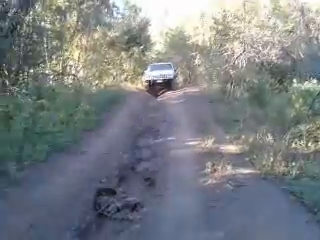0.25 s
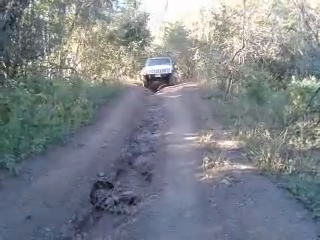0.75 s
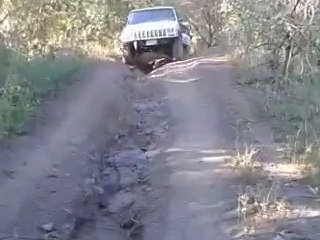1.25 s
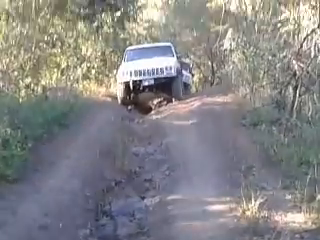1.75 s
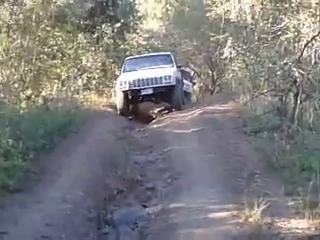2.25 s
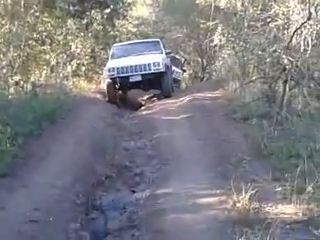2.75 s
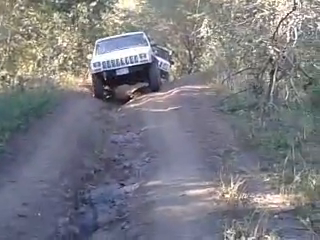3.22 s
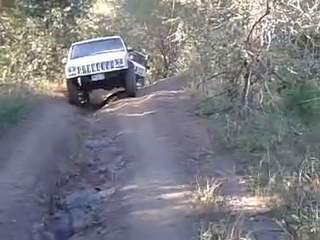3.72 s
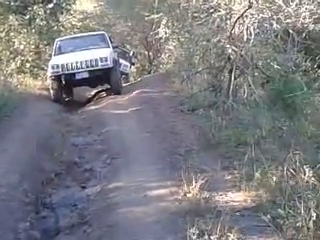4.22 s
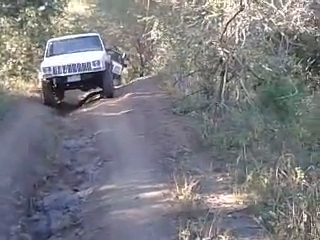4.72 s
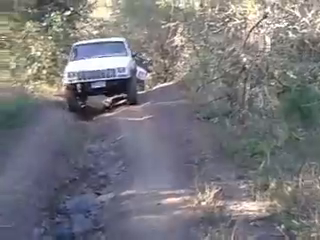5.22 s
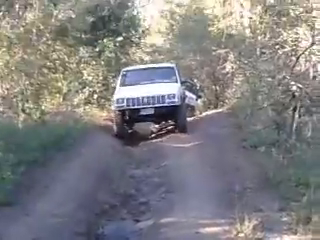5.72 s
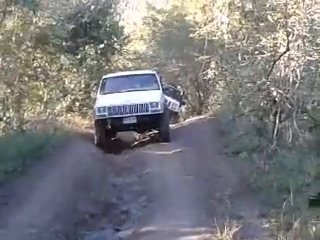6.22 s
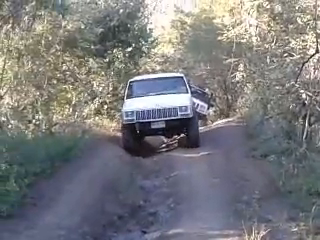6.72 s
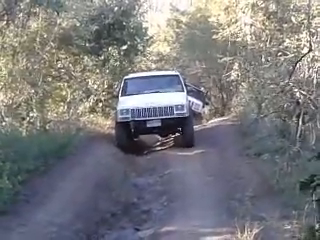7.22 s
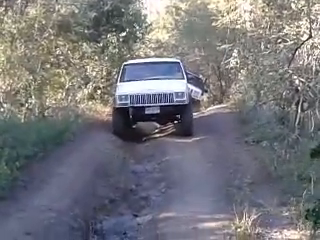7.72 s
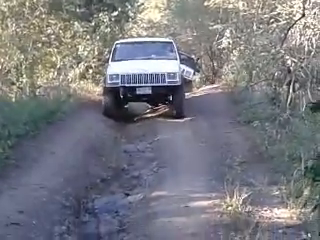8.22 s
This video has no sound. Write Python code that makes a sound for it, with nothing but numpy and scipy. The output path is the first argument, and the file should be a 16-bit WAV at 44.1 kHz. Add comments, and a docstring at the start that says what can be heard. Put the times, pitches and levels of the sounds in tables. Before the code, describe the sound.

Loud close knocks and cracks on a plastic case, then a distant rough engine idling steadily uphill, with more handling clicks and a faint whine.

```python
"""A six-cylinder four-wheel-drive idles slowly up a rutted forest trail toward a small hand-held camera.
Fingers on the camera's plastic case and buttons make close knocks, cracks and creaks; its motor whines faintly.
The engine is a stack of wavering crank orders, with a second drone early on; fan, gears and tyres are
shaped noise. Knocks are damped rings with noise bursts, creaks dense ticks, the motor tones and a noise whir."""
import sys
import numpy as np
from scipy import signal
from scipy.fft import rfft, irfft, next_fast_len
from scipy.io import wavfile
from scipy.ndimage import uniform_filter1d

SR = 44100
rng = np.random.default_rng(int(sys.argv[2]) if len(sys.argv) > 2 else 0)


def gain_from_db(level_db):
    """Turn a decibel level (scalar or array-like) into a linear amplitude factor."""
    decades = np.asarray(level_db, float) / 20
    return 10 ** decades


def inscribe(sig):
    """Save sig as 16-bit PCM at rate SR to the path in sys.argv[1].

    A 1-D sig is mono; a 2-D sig holds one channel per row.
    Samples are clipped to [-1, 1] before scaling.
    """
    pcm = np.round(np.clip(np.atleast_2d(sig).T, -1, 1) * 32767)
    wavfile.write(sys.argv[1], SR, pcm.astype(np.int16))


N = 373086
TIME = np.arange(N) / SR

# Treble colour of cracks and creaks on the case: f/Hz, gain/dB
CRACK_COLOUR = [(1500, -26.5), (2500, -6.5), (3500, -6.5), (4800, -10.5), (5800, 0), (6800, -3.5),
                (7600, -32), (9000, -13.5)]


def level(x, db):
    """Scale to an rms level."""
    return x * gain_from_db(db) / np.sqrt(np.mean(x ** 2))


def curves(rows):
    """Columns of a time table, interpolated sample by sample."""
    s, *columns = np.transpose(rows)
    return [np.interp(TIME, s, column) for column in columns]


def colour(x, points):
    """Shape a spectrum through (Hz, dB) points."""
    hz, db = np.transpose(points)
    size = next_fast_len(len(x))
    bins_hz = np.fft.rfftfreq(size, 1 / SR)
    gain = gain_from_db(np.interp(np.log(bins_hz + 1), np.log(hz), db))
    return irfft(rfft(x, size) * gain, size)[:len(x)]


def band(x, hz, width_hz):
    """One resonance, gain 1 at the centre."""
    return signal.lfilter(*signal.iirpeak(hz, hz / width_hz, fs=SR), x)


def walk(rate):
    """Random levels held for 1 / rate seconds and slewed twice; spread near 1."""
    hold = int(SR / rate)
    steps = np.repeat(rng.standard_normal(N // hold + 1), hold)
    return 1.578 * uniform_filter1d(uniform_filter1d(steps, hold), hold)[:N]


def arch(start_s, length_s):
    """Half a sine over the given stretch, silent outside it."""
    return np.sin(np.pi * np.clip((TIME - start_s) / length_s, 0, 1))


def engine():
    """Crank orders as wavering tones; uneven cylinders fill the orders between the firings."""
    # Revs and two firing multiples: t/s, firing rate f/Hz, 6th multiple level/dB, 9th multiple level/dB
    revs = [(0.5, 35.3, -64, -66), (0.75, 36, -47, -63), (1.13, 35.6, -62, -62), (1.4, 36.38, -61, -59),
            (1.95, 36.19, -51.5, -49.5), (2.78, 35.5, -61, -52.5), (3.27, 37.5, -53, -51),
            (3.7, 36.66, -44.5, -48.5), (4.2, 36.32, -51, -48), (4.9, 35.05, -74, -53),
            (5.5, 37.37, -52, -52), (6.0, 37.23, -58, -50), (6.6, 36.8, -53, -51.5),
            (6.9, 35.7, -60, -47.5), (7.3, 36.33, -57.5, -50), (8.1, 35.8, -62, -49.5),
            (8.46, 36.27, -60, -50)]
    # Steady crank orders: multiple of the crank rate, level/dB against reference_db
    crank = [(1, -36), (2, -29.5), (3, -8), (4, -39), (5, -31.5), (6, -8), (7, -28), (8, -33.5), (9, -14.5),
             (10, -20.5), (11, -11), (13, -21), (14, -24.5), (15, -12.5), (16, -11.5), (17, -26.5),
             (19, -17), (20, -25.5), (21, -19.5), (22, -23), (23, -14.5), (24, -7), (25, -8.5), (26, -8),
             (28, -12), (29, -9), (30, -15), (31, -16), (32, -18.5), (33, -10.5), (34, -13), (35, -20.5),
             (36, -26.5)]
    reference_db, idle_hz = -51.5, 36
    firing_hz, sixth_db, ninth_db = curves(revs)
    firing_hz = firing_hz + 0.2044 * walk(4.0)
    turn = 2 * np.pi * np.cumsum(firing_hz / 3) / SR  # three firings a crank turn
    # the 4th firing multiple weakens as the revs rise above idle
    fourth_db = -51.5 - 1.5 * (firing_hz - idle_hz)
    orders = [(order, db + reference_db) for order, db in crank]
    orders += [(12, fourth_db), (18, sixth_db), (27, ninth_db)]
    out = 0
    # the orders keep nearly in step, so the exhaust puffs once a turn
    for order, db in orders:
        loudness = np.sqrt(2) * gain_from_db(db + 1.18 * walk(9.0))
        offset = 0.49 * walk(6.5) + 0.03035 * order ** 2 + 0.5 * rng.standard_normal()
        out = out + loudness * np.sin(order * turn + offset)
    return out, turn


def drone():
    """Fifth and sixth multiples of a slower pulse that rises and sinks in one arch early on."""
    start_s, length_s = 0.497, 1.157
    progress = np.clip((TIME - start_s) / length_s, 0, 1)
    swell = np.sin(np.pi * progress ** 1.39) ** 2
    turn = 2 * np.pi * np.cumsum(256 + 12.94 * swell) / SR  # Hz of the sixth multiple
    sixth = np.sin(turn)
    fifth = gain_from_db(-9.5) * np.sin(5 / 6 * turn)
    fade = np.clip((start_s + length_s - TIME) / 0.11, 0, 1)
    return fade * np.sqrt(2) * gain_from_db(-54.0 + 5.5 * swell) * (sixth + fifth)


def running(turn):
    """Fan, gears and tyres: flickering noise bands, bay resonances puffed by the engine, and grit scuffs."""
    # Swell of the running noise: t/s, lower bay gain/dB, treble gain/dB
    swells = [(0.45, -2.5, 3.5), (1.0, -5.5, 2), (1.38, -3.5, 5.5), (1.65, -2.5, 2), (2.3, 0.5, 2),
              (2.7, -4.5, 0.5), (3.2, -0.5, -0.5), (3.75, -0.5, -0.5), (4.0, -3.5, -0.5), (4.7, 0.5, -0.5),
              (5.05, 0, 1), (6.15, -0.5, -1.5), (6.5, -2, -0.5), (7.5, -2.5, -1.5), (8.3, 2, -.5)]
    # Spectral shape of the running noise: f/Hz, relative density/dB
    spectrum = [(20, -10.5), (60, -28.5), (100, -32), (140, -13), (260, -9.5), (330, -6.5), (600, -8),
                (1000, -3), (1700, -7.5), (2400, -12), (3000, -19.5), (4500, -20), (4900, -24.5),
                (5200, -23), (6000, -24.5), (6900, -20.5), (7400, -32.5), (8000, -66.5)]
    # Resonances of bonnet and grille: f/Hz, width/Hz, level/dB before puff and swell
    bay = [(334, 98, -55.5), (890, 230, -52), (1250, 59, -47), (1335, 75, -56.5), (1567, 90, -50),
           (4280, 330, -60), (6380, 89, -66.5)]
    # A tyre scuffs loose grit: t/s, length/s, level/dB before the arch
    scuffs = [(6.18, 0.055, -33), (3.42, .04, -38), (6.1, 0.045, -45)]
    lower_db, top_db = curves(swells)
    low_db, upper_db = 0.68 * walk(3.01), 1.3 * walk(2.5)
    noise = level(colour(rng.standard_normal(N), spectrum), -41.0)
    edges_hz = [20, 420, 1050, 1450, 2600, 4000, 5500, 9000]
    band_db = [np.zeros(N), low_db, lower_db, upper_db, top_db, top_db, 0.5 * top_db]
    out = np.zeros(N)
    for lo, hi, db in zip(edges_hz, edges_hz[1:], band_db):
        split = signal.butter(2, [lo, hi], "bandpass", fs=SR, output="sos")
        out += gain_from_db(db + 1.1 * walk(14.0)) * signal.sosfiltfilt(split, noise)
    for hz, width_hz, db in bay:
        # the lowest resonance puffs once a turn, the others once a firing
        puff = 1 + (0.8 * np.cos(turn) if hz < 500 else 0.36 * np.cos(3 * turn))
        swell_db = band_db[np.searchsorted(edges_hz, hz) - 1] + 0.49 * walk(4.2)
        out += puff * gain_from_db(swell_db) * level(band(rng.standard_normal(N), hz, width_hz), db)
    for start_s, length_s, db in scuffs:
        grit = band(band(rng.standard_normal(N), 1200.0, 1200.0), 1300.0, 1500.0)
        out += arch(start_s, length_s) * level(grit, db)
    return out


def knocks():
    """Each touch: a damped, rattly ring of the case, a mid snap and a crack of a millisecond or two."""
    # Knocks on case and buttons: t/s, ring f/Hz, ring level/dB, snap level/dB, crack level/dB
    touches = [(0.1274, 730, -13, -20, -31), (0.1625, 752, -0.5, -1.5, 0.5),
               (0.183, 710, -17.5, -14.5, -15), (.192, 590, -15, -12.5, -35), (.244, 505, -4.5, -5.5, 1),
               (0.2646, 477, -16, -16, -8.5), (0.3159, 400, -23.5, -14, -18), (0.3258, 300, -32, -35, -25),
               (.347, 600, -15.5, -19, -38), (.350, 330, -9, -24.5, -37), (0.4105, 930, -20, 0.5, 5.5),
               (0.4161, 550, -15, -9.5, -12.5), (2.0708, 1097, -15.5, 1.5, -3.5),
               (2.0725, 594, -11, -7.5, -35), (2.1487, 873, -25, -3, -9.5), (2.152, 745, -9.5, -2.5, -11),
               (2.157, 450, -11.5, -32, -38), (2.163, 480, -15, -26, -45), (2.188, 1004, -29, -35, -42),
               (2.2925, 800, -22, -17.5, -23), (2.325, 650, -13, -23, -19.5), (2.328, 603, -2.5, -14, -32),
               (2.399, 700, -17, -34, -40), (2.415, 900, -8, -4.5, -18.5), (2.4175, 424, -6, -2.5, -8),
               (2.420, 182, -10, -38, -38), (2.574, 1100, -23, -31, -20.5),
               (2.580, 1000, -20.5, -34, -20.5), (2.5952, 870, -4.5, -20, -3), (2.5992, 1110, -3, -16, -26),
               (2.607, 380, -16, -37, -50), (2.633, 945, -10, -28.5, -46), (2.673, 1220, -28, -20, -27),
               (2.955, 540, -21.5, -15.5, -24.5), (3.355, 645, -28, -39, -48),
               (3.435, 988.6, -35, -23.5, -35.5), (4.663, 6770, -11, -30, -15.5),
               (4.671, 6650, -21, -48, -45), (4.693, 6540, -32.5, -48, -43), (5.282, 605, -20, -38, -51),
               (5.284, 268, -25.5, -50, -50), (5.656, 600, -24.5, -37, -47),
               (7.2283, 6100, -31.5, -23, -33), (7.268, 5980, -34, -30.5, -40),
               (7.982, 1288, -25, -37, -47)]
    # Thin ticks of the case, too light to ring it: t/s, snap level/dB, crack level/dB
    ticks = [(2.2305, -42, -28.5), (2.3896, -32, -29), (2.429, -37, -25), (2.4897, -36, -31),
             (2.7501, -34, -27.5), (2.8634, -34, -24.5), (4.2702, -35, -36), (7.1565, -32, -29.5),
             (7.662, -37, -32)]
    button_above_hz = 3000  # higher rings are a button, one steady mode
    sag_share, sag_s = 0.24, 0.0066  # the case's pitch sags as the finger settles
    out, t = np.zeros(N + SR), np.arange(SR // 10) / SR
    burst = np.e * t / 0.00067 * np.exp(-t / 0.00059)
    sagging = (1 - sag_share) * t + sag_share * sag_s * (1 - np.exp(-t / sag_s))
    rows = list(touches) + [(s, button_above_hz, -np.inf, *dbs) for s, *dbs in ticks]
    for s, ring_hz, ring_db, snap_db, crack_db in rows:
        snap_noise, crack_noise, rattle_noise = rng.standard_normal((3, len(t)))
        if ring_hz < button_above_hz:
            t60_s = 0.014 + 4.5 / ring_hz  # a fixed time plus a few of its own cycles
            turn = 2 * np.pi * ring_hz * sagging
            ring = np.sin(turn) + 0.44 * np.sin(0.717 * turn) + 0.13 * np.sin(1.423 * turn)
        else:
            t60_s = 0.012
            ring = np.sin(2 * np.pi * ring_hz * t)
        rattle = band(band(rattle_noise, ring_hz, ring_hz), ring_hz, ring_hz)
        ring = ring + level(rattle, -5.5)
        fall = (1 - np.exp(-t / 0.00027)) * np.exp(-np.log(1000) * t / t60_s)
        snap = level(band(band(snap_noise, 1800.0, 2200.0), 1800.0, 2300.0), -4.5)
        crack = level(colour(crack_noise, CRACK_COLOUR), -7.0)
        i = int(s * SR)
        out[i:i + len(t)] += gain_from_db(ring_db) * fall * ring
        out[i:i + len(t)] += burst * (gain_from_db(snap_db) * snap + gain_from_db(crack_db) * crack)
    return out[:N]


def creaks():
    """Skin sticks and slips: dense uneven ticks into the body and the treble of the case."""
    # Fingers creak over the plastic: t/s, length/s, body level/dB, treble level/dB
    strokes = [(0.116, 0.035, -37, -44), (0.168, 0.052, -30, -37.5), (0.226, 0.033, -27.5, -32),
               (0.344, 0.011, -17.5, -47), (2.127, 0.021, -39, -36.5), (2.157, 0.019, -41, -47.5),
               (2.28, 0.01, -34, -35.5), (2.317, 0.036, -30.5, -42.5), (2.543, 0.019, -47.5, -41),
               (2.632, 0.024, -34, -37.5)]
    slips = rng.random(N) < 1500.0 / SR  # about 1500 a second
    ticks = slips * gain_from_db(2.5 * rng.exponential(size=N)) * rng.choice([-1, 1], N)
    body = level(band(band(ticks, 740.0, 990.0), 900.0, 2000.0), 0)
    treble = level(colour(ticks, CRACK_COLOUR), 0)
    out = np.zeros(N)
    for start_s, length_s, body_db, treble_db in strokes:
        stroke = np.maximum(arch(start_s, length_s), 0) ** 0.5
        out += stroke * (gain_from_db(body_db) * body + gain_from_db(treble_db) * treble)
    return out


def motor():
    """Steady lines from the camera's drive, a rough whine that grows, and one whir of the zoom."""
    # Rough whine: t/s, level/dB
    whine = [(.5, -64.5), (2, -64), (3.3, -55), (5.3, -53.5), (6.5, -47), (8.46, -48.5)]
    # Partials of the whine: multiple, level/dB against the whine, share of its swell
    partials = [(1, 0, 1), (1.5, -4, .5), (6, -16, .4)]
    # Drive lines: f/Hz, level/dB, waver/dB
    drive = [(37.9, -56.5, 2.5), (76.2, -56.5, 1.5)]
    # Zoom whir: t/s, length/s, f/Hz, width/Hz, level/dB before the arch
    zoom = (1.8, 1.2, 3860., 90., -56.5)
    whine_db, = curves(whine)
    mean_db = np.mean(whine_db)
    turn = 2 * np.pi * np.cumsum(825.3 + 1.5 * walk(2.5)) / SR
    tones = np.zeros(N)
    for multiple, part_db, share in partials:
        db = mean_db + share * (whine_db - mean_db) + part_db + 1.5 * walk(25.0)
        tones += gain_from_db(db) * np.sin(multiple * turn + 0.6 * walk(13.0))
    for hz, db, waver_db in drive:
        phase = 2 * np.pi * hz * TIME + 0.26 * waver_db * walk(12.0)
        tones += gain_from_db(db + waver_db * walk(7.4)) * np.sin(phase)
    start_s, length_s, hz, width_hz, db = zoom
    whir = level(band(rng.standard_normal(N), hz, width_hz), db)
    return np.sqrt(2) * tones + np.maximum(arch(start_s, length_s), 0) ** 0.5 * whir


def scene():
    """Vehicle at a distance, camera noises close; the case passes little deep bass to the microphone."""
    tones, turn = engine()
    no_bass = signal.butter(3, 125.0, "highpass", fs=SR, output="sos")
    touch = signal.sosfilt(no_bass, knocks() + creaks())
    return (tones + drone() + running(turn) + motor() + touch)[None]


def top_cut(x):
    """Nothing passes above the cut-off."""
    return signal.sosfilt(signal.butter(12, 8430, fs=SR, output="sos"), x)


def record(dry):
    """After a short silence, a microphone whose port rings near 6.8 kHz; knocks overload it, the top is cut."""
    on = TIME > 0.1195
    x = dry + 0.5 * band(dry, 6790.0, 410.0)
    x = 0.98 * np.tanh(x * on / 0.98)
    x = signal.sosfilt(signal.ellip(6, 0.3, 60, 7200.0, fs=SR, output="sos"), x)
    # sampling at 16 kHz leaves a faint mirror of the treble above 8 kHz
    mirror = x * np.cos(2 * np.pi * 16000 * TIME)
    above = signal.butter(4, [8000, 9500], "bandpass", fs=SR, output="sos")
    x = x + gain_from_db(-40.5) * signal.sosfilt(above, mirror)
    mix = np.clip(1.062 * x + 0.0014 * on, -1, 1)  # with a small constant offset
    return top_cut(mix)


dry = scene()
out = record(dry)
inscribe(out)
```